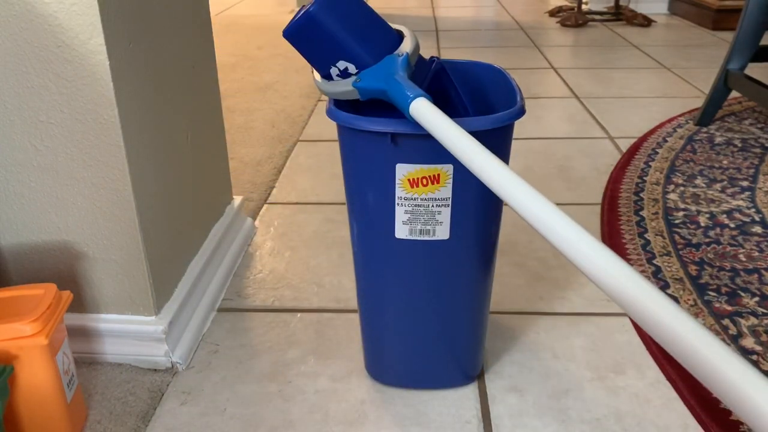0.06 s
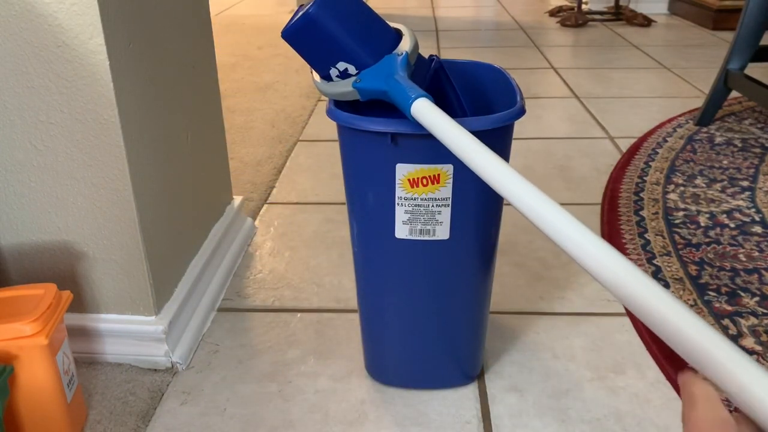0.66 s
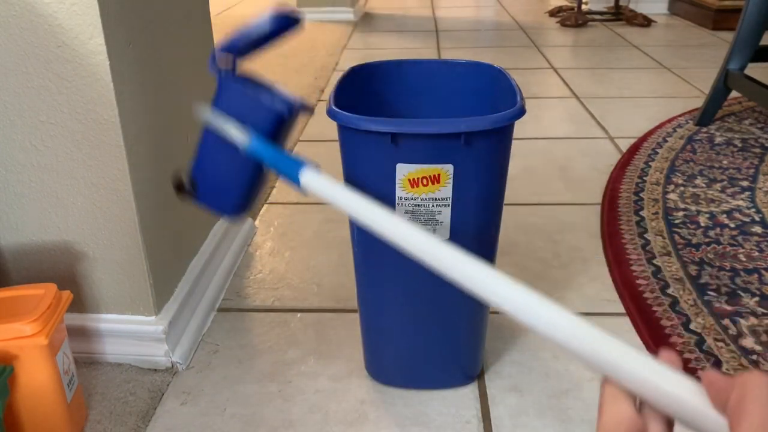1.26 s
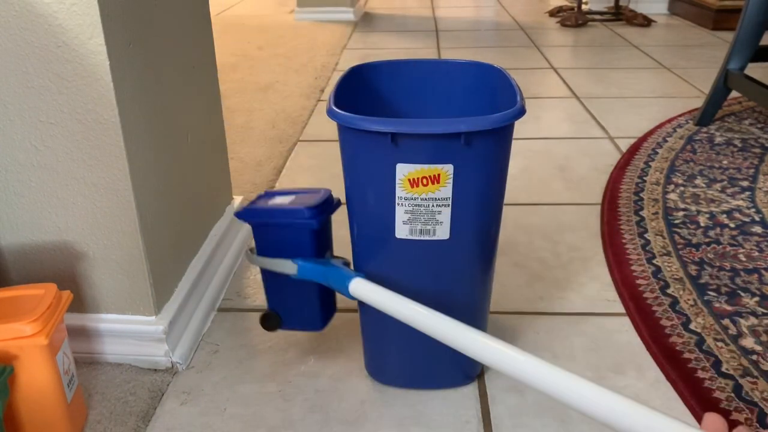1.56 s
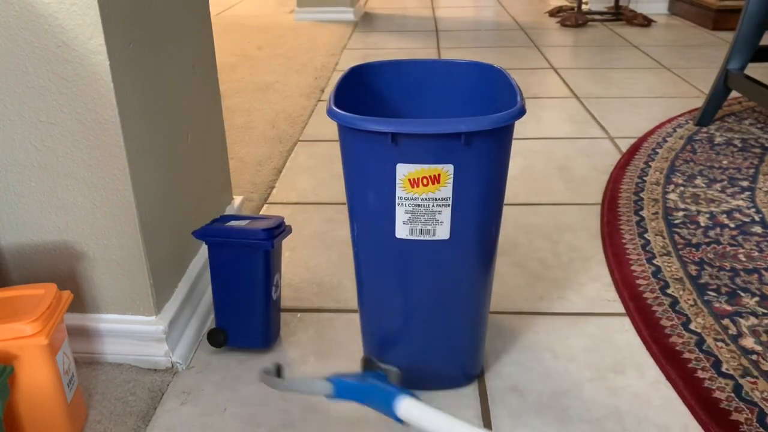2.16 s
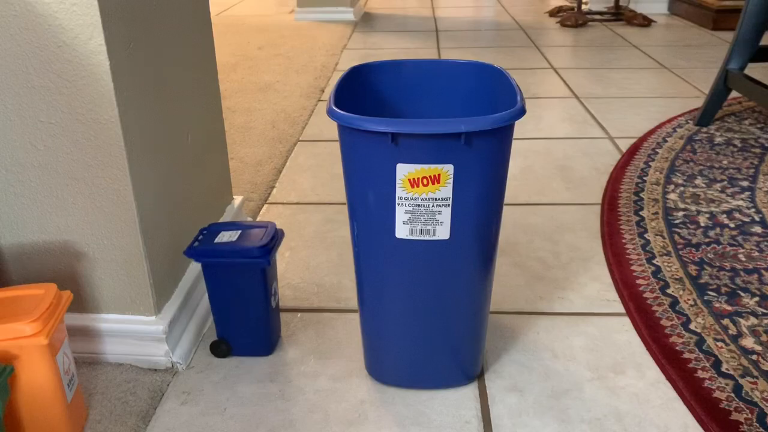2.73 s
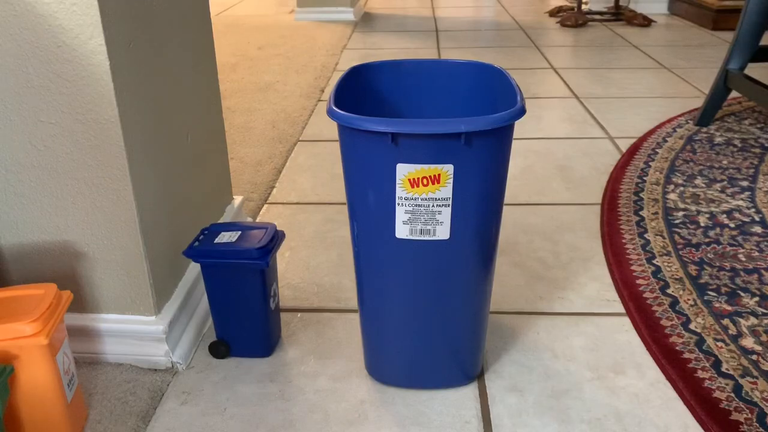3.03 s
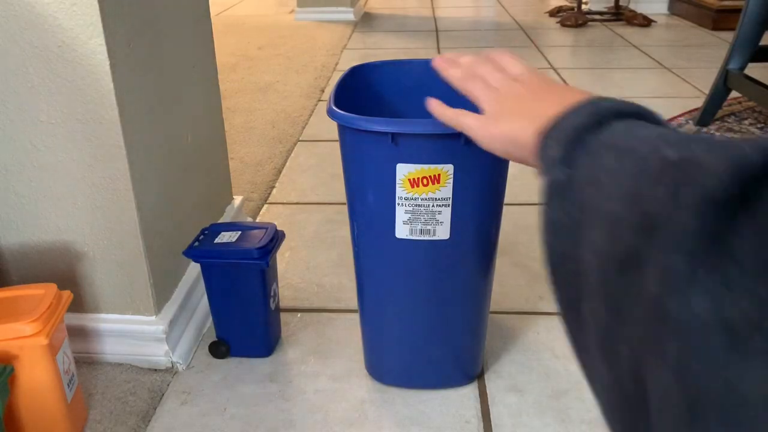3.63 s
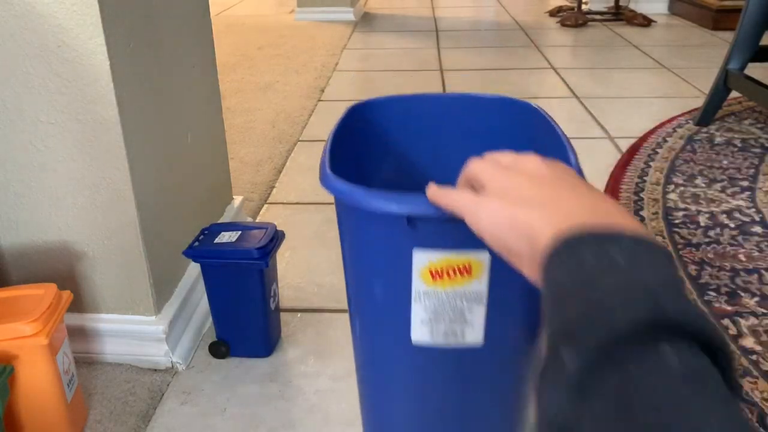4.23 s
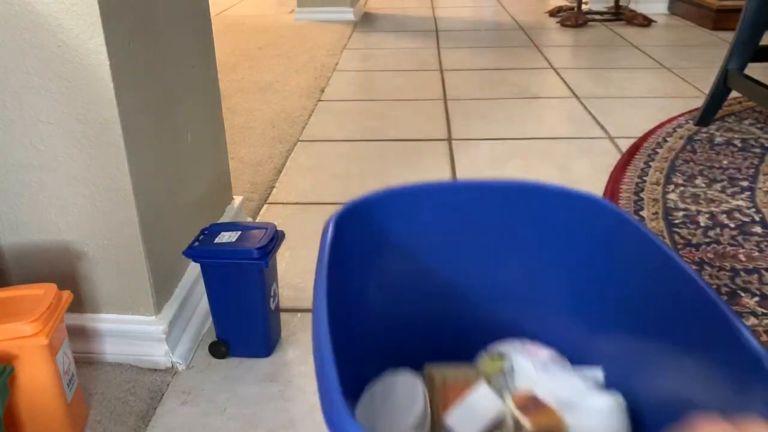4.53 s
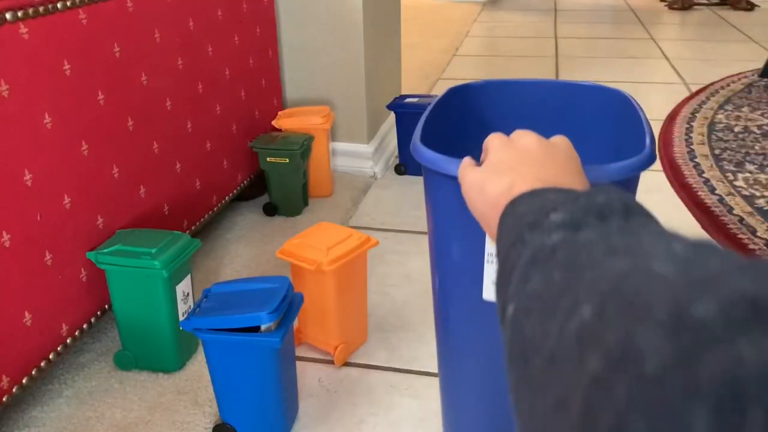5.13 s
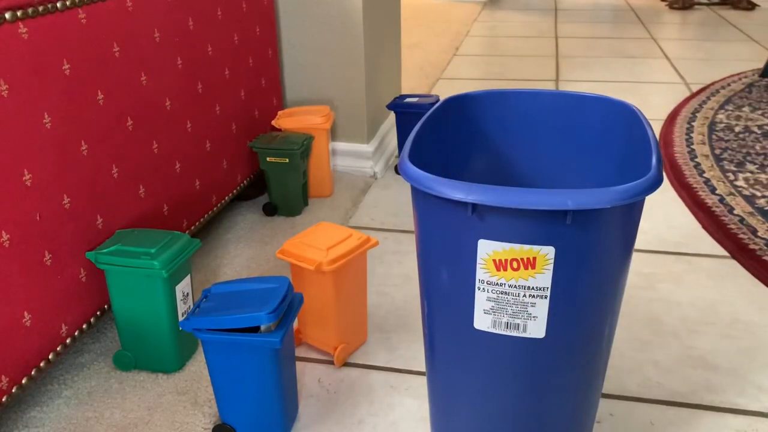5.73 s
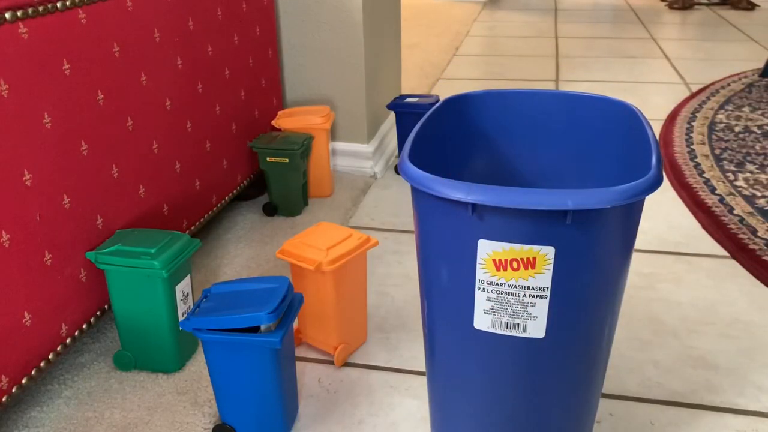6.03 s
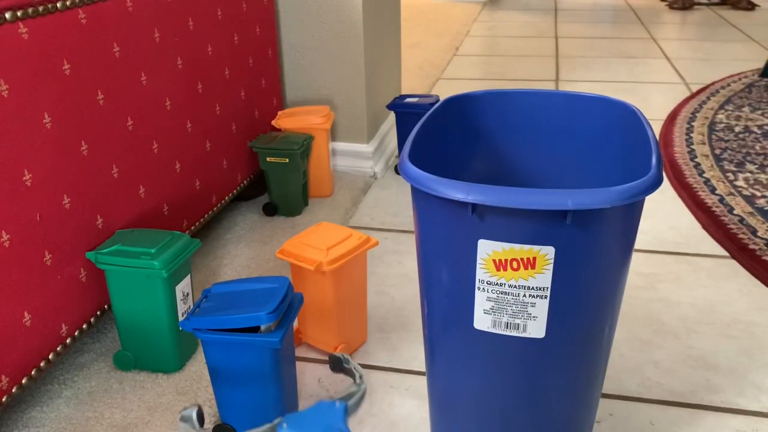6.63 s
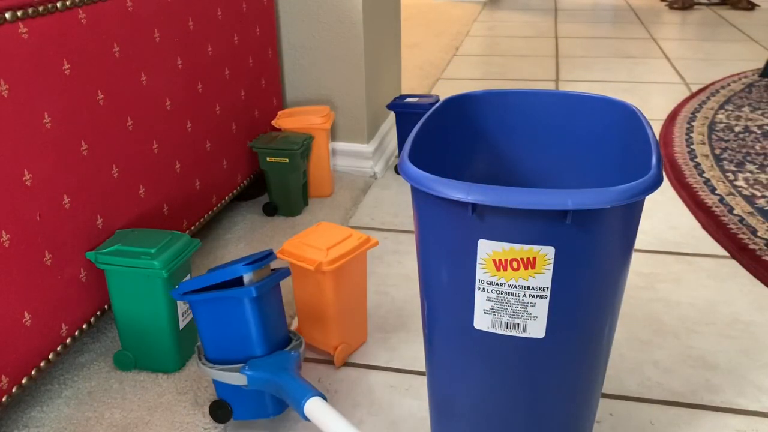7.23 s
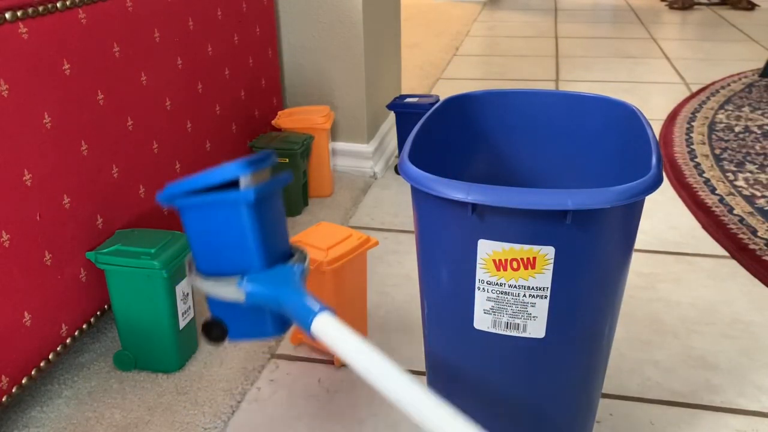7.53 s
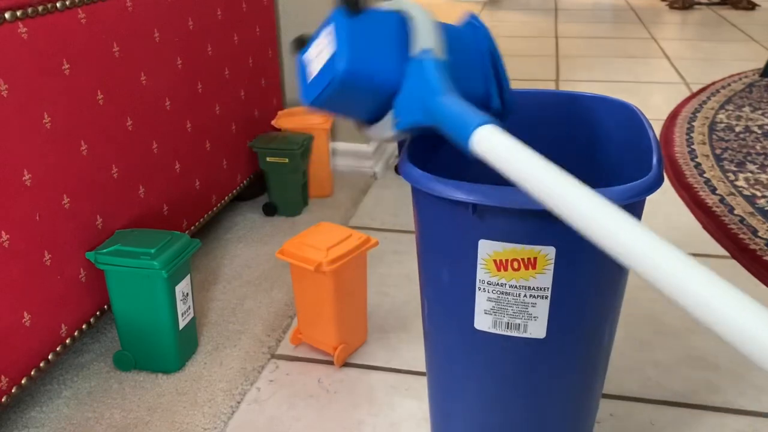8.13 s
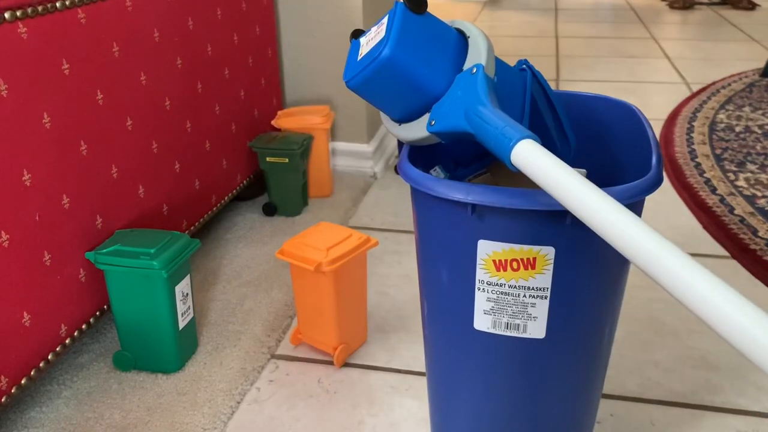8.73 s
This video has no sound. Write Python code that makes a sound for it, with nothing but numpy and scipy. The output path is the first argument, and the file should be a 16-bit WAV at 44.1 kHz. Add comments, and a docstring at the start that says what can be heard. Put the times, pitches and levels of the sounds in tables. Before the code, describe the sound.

In a small, lively tiled room, heard close up in stereo over a faint hum, a grabber sets down a plastic toy bin with hollow knocks and rocking clacks. Next a plastic wastebasket scrapes and rumbles along the floor twice, its base sticking and slipping. A sleeve brushes softly, the grabber's jaws clack shut on a second toy bin, and it thumps as it is lifted. Finally paper scraps rustle out and tap against the basket's wall.

```python
"""A small live room with a tile floor, heard from a close stereo microphone pair over a faint hum. A grabber
sets down and picks up small plastic toy bins: they knock, rock and clack, each contact pushing a thin wall and
ringing the hollow body. A tall plastic wastebasket is dragged over the tiles, its base sticking and slipping,
and the level dips briefly midway. Paper scraps are then tipped into it from a toy bin, crinkling as they slide
and clicking against its wall. Hand and sleeve rub softly as the arm moves."""
import sys
import numpy as np
from scipy import signal
from scipy.fft import rfft, irfft, next_fast_len
from scipy.io import wavfile
from scipy.ndimage import map_coordinates

SR = 44100
rng = np.random.default_rng(int(sys.argv[2]) if len(sys.argv) > 2 else 0)


def transcribe(u):
    """Save the signal u as a 16-bit wav file named by the first command-line argument.

    u: samples, shape (n,) or (channels, n), limited to [-1, 1]; the rate is SR.
    q: integer samples, one column per channel.
    """
    v = np.clip(np.atleast_2d(u).T, -1, 1)
    q = np.round(v * 32767).astype(np.int16)
    wavfile.write(sys.argv[1], SR, q)


N = 387198
HIT_SIZE, BLOW_SIZE = 8192, SR // 100  # samples: room for one contact; span its level is taken over

# A toy bin jolts in the grabber and its lid flaps.
# Each row: start in seconds, level in dB, thump pitch in Hz, hardness in dB.
JOLTS = [(0.972, -51.5, 600, -39), (1.07, -54.5, 630, -18), (1.3105, -16.5, 317, -7),
         (1.351, -38.5, 314, -13), (1.361, -26, 301.5, -9.5), (1.534, -33.5, 291, -15),
         (1.8535, -25.5, 386, -2.5), (1.8845, -23.5, 276, -21), (1.899, -30, 271.8, -5.5),
         (7.797, -24.5, 214, -28), (7.811, -50, 208, -3), (7.945, -42, 227, -37), (7.963, -49, 218, -52)]
# Hand, tile joints and toy bin bump the basket. Each row: as for the jolts.
BASKET_BUMPS = [(3.659, -41.5, 228, -34), (4.064, -32, 264, -13), (4.074, -31, 154, -22),
                (4.163, -39.5, 302, 3.5), (4.19, -45, 302, 6.5), (4.222, -30, 258, 1.5),
                (4.239, -33, 191, 5.5), (4.26, -41, 300, 10), (4.281, -32, 330, 4), (4.338, -34.5, 303, 2),
                (4.378, -41.5, 305, 10), (4.477, -28, 262, -11), (4.494, -32, 173, -23),
                (4.503, -20.5, 138, -13.5), (4.598, -30, 513, -11), (4.8075, -31.5, 271, -3.5),
                (4.81, -24, 164, -41), (4.865, -36, 260, -4), (4.882, -29, 184, -17),
                (4.904, -32.5, 312.5, -6.5), (8.1535, -30.5, 403, -2.5), (8.156, -24.5, 202, -34),
                (8.167, -31.5, 186, -45)]
# A bin lands and rocks to rest. Each row: as for the jolts, then boom in dB.
LANDINGS = [(1.7051, -31, 433, 2, 1), (1.7176, -14.5, 407, -8.5, -2.5), (1.996, -36.5, 430, -45, -3),
            (2.001, -24, 448, -24, 1), (2.016, -33, 480, -35, 4.5), (2.333, -24, 425, -22, -2.5),
            (2.347, -36.5, 480, -37, 7), (2.357, -31.5, 470, -18, 0.5), (2.535, -33, 440, -37, 0),
            (2.541, -33, 461, -29.5, 1.5), (2.683, -29, 380, -28, -2), (2.763, -32, 406, -14.5, 2.5),
            (2.774, -37.5, 388, -21, 1)]
# Contacts that share a thump pitch. Each row: start in seconds, level in dB, hardness in dB.
JAW_GRABS = [(6.758, -36, 1.5), (6.772, -36, -14), (6.802, -44, -3), (6.8178, -26.5, 7), (6.827, -29, -4),
             (6.851, -36, -18), (6.9055, -21.5, 1), (6.918, -24, -24)]  # the jaws close on a bin
LOOSE_TICKS = [(0.105, -55, -18), (0.712, -53, -55), (0.7465, -45, -31), (1.227, -51, -56),
               (1.610, -48.5, -15.5), (1.648, -49, -10), (1.696, -37.5, 6), (1.702, -39, -11),
               (2.741, -38, 4), (2.996, -47.5, -5), (3.105, -53, -2), (3.685, -57.5, -4), (5.28, -63, -4.5),
               (5.35, -67.5, 4), (5.375, -57.5, -11), (5.743, -58, 3), (5.808, -55, 8.5), (5.832, -53, -20),
               (5.841, -52, 0), (5.889, -54, -36), (5.92, -64, 7.5), (7.792, -48, 9)]  # loose plastic parts touch
SCRAP_HITS = [(8.202, -58.5, 18.5), (8.275, -45.5, 2), (8.36, -44, 9), (8.374, -56.5, 20.5),
              (8.456, -39, -6), (8.466, -49, 9), (8.485, -44.5, 12), (8.5, -31, 0), (8.536, -51.5, 5),
              (8.57, -36.5, -1.5), (8.593, -46.5, -2)]  # scraps land in the basket
# Small pieces are struck. Each row: start in seconds, level in dB, pitch in Hz.
CLINKS = [(1.72, -30, 2970), (1.852, -37.5, 2800), (2.743, -47.5, 2790), (2.752, -50, 2960),
          (8.199, -56, 4234), (8.222, -50.5, 4800), (8.261, -55, 4240), (8.273, -58, 4530),
          (8.483, -53, 4480), (8.499, -35, 8620), (8.536, -47, 8900)]  # thin stiff bits
TOCKS = [(2.996, -56.5, 1264), (5.843, -50, 1228), (8.157, -39.5, 871.5), (8.254, -45, 505),
         (8.347, -46.5, 520), (8.359, -47, 802), (8.451, -49, 818), (8.458, -42, 770), (8.467, -50, 825),
         (8.498, -37.5, 847), (8.513, -42.5, 900), (8.563, -49, 796), (8.592, -49, 800)]  # hard scraps and loose parts on hollow plastic

# The basket's drag in two spans, a list for each. Each row: time in seconds, friction level in dB.
DRAG_SPANS = [
    [(3.72, -74), (3.84, -63), (3.905, -50), (4.09, -41), (4.205, -39), (4.24, -34), (4.37, -38.5),
     (4.44, -45), (4.5, -38.5), (4.7, -47.5)],
    [(4.735, -51.5), (4.9, -44), (4.955, -47), (4.99, -44.5), (5.04, -46), (5.15, -46.5), (5.34, -73.5)],
]
GRIT_DB, RUMBLE_DB = (-4, -6.5), (-2.5, -0.5)  # scratch and wall rumble of each span, over its friction
# Strokes that swell and fade. Each row: peak time in seconds, level in dB, rise and fade in seconds.
BASE_CHATTERS = [(4.5, -40.5, 0.22, 0.36), (4.91, -46.5, 0.036, 0.093)]  # the basket's tilted base on the tiles
PAPER_SLIDES = [(0.005, -58, 0.034, 0.31), (5.83, -62, 0.16, 0.12), (8.21, -52.5, 0.29, 0.28),
                (8.275, -54.5, 0.16, 0.23), (8.52, -48, 0.29, 0.16)]  # scraps shifting
HAND_RUBS = [(0.12, -62, 0.55, 0.6), (0.82, -57, 0.4, 0.25), (5.8, -68.5, 1.8, 0.48),
             (8.18, -51.5, 0.76, 0.85), (8.53, -48, 0.15, 0.16)]  # hand and sleeve on grabber and basket
ROD_SLIDES = [(0.2, -75, 0.71, 0.34), (0.56, -64.5, 0.85, 0.42), (3.28, -71.5, 0.42, .25),
              (3.47, -72.5, 0.17, 0.15), (7.27, -74.5, 0.16, 0.056)]  # the grabber's rod and jaws
SLEEVE_BRUSHES = [(3.75, -67.5, 0.46, .4), (5.55, -64, 0.58, 0.73), (6.17, -72, 0.31, 0.45),
                  (6.55, -84.5, 0.37, 0.33), (7.7, -75.5, 0.53, 0.28)]  # a sleeve going past
# Plastic slips on plastic or tile. Each row: as for the strokes, then pitch in Hz, waver in Hz.
SQUEAKS = [(0.01, -62.5, 0.14, 0.24, 6710, 130), (2.733, -49, 0.12, 0.1, 2957, 194),
           (7.342, -70, 0.059, 0.092, 4330, 200.7), (7.401, -74, 0.045, 0.25, 4330, 269),
           (7.529, -74.5, 0.25, 0.96, 4336, 298)]

# Ring of the hollow bodies. Each row: frequency in Hz, level in dB.
TOY_MODES = [(371, -48), (433, -37), (510, -50), (645, -48), (682, -48), (965, -49.5), (1039, -52),
             (1292, -54.5), (1470, -51.5), (1780, -54), (2669, -58), (2900, -53), (3973, -60), (4151, -59)]
BASKET_MODES = [(165, 6), (225, 11.5), (305, 6), (510, 5.5), (610, 11), (810, 2), (1130, -2), (1960, -8)]
JAW_MODES = [(425, 3), (520, -10), (700, -3), (800, 0.5), (1040, -0.5), (1250, -6), (1850, -15.5),
             (2330, -12), (2790, -7.5)]  # the jaws with a bin between them
# Ring of the small pieces. Each row: multiple of the piece's pitch, level in dB.
CLINK_MODES = [(0.298, -7), (.64, -7.5), (0.901, -6), (1.001, 8.5), (1.16, -15.5), (1.62, -10.5)]
TOCK_MODES = [(.91, -8), (1, 3), (1.37, -7), (2, -7), (2.901, -14), (3.7, -17), (5.3, -18)]
# Resonances of the dragged basket. Each row: centre in Hz, width in Hz, level in dB.
BASKET_HOLLOW = [(128.6, 31, 7), (567, 130, -3.5), (904, 110, -0.5), (1273, 160, -4.5), (1999, 140, -5)]

# Spectra of a contact's body. Each row: multiple of the thump or clack pitch, level in dB.
WALL_THUMP = [(.05, -53.5), (.14, -36.5), (.3, -24), (.55, -4.5), (.9, 3.5), (1.25, -0.5), (2, -22),
              (4, -33), (12, -68.5)]
HARD_CLACK = [(.2, -31.5), (.5, -5), (.8, 2.5), (1.1, -3.5), (1.6, -6), (2.402, -14), (3.6, -24), (9, -30)]
FLOOR_CLACK = [(.03, -62.5), (.18, -36.5), (.5, -2), (.8, 0), (1.15, -3.5), (1.55, -8), (2.3, -17),
               (3.6, -25), (9, -42.5)]  # rounder: a bin on tile
GRIP_CLACK = [(.03, -49.5), (.2, -24), (.45, -3.5), (.8, -2.5), (1.1, -1), (1.5, -11.5), (2.5, -18),
              (3.6, -32.5), (9, -39.5)]  # round: a bin in the jaws
# Spectra of sharp edges, friction and air. Each row: frequency in Hz, spectral density in dB.
EDGE_CRACK = [(1200, -37.5), (3200, 2), (5500, -2.5), (8000, -1), (11500, 6), (14000, 2), (16000, -15.5)]
JAW_SNAP = [(1500, -52), (3200, -6.5), (5500, -12), (8000, -8.5), (11500, 8), (14000, 0.5), (16000, -10)]
WALL_RUMBLE = [(30, -34), (60, -9), (130, -7.5), (200, 2), (300, -2), (450, -10), (800, -43.5), (2000, -53)]
CHATTER_BAND = [(250, -22.5), (450, 0.5), (600, -3.5), (800, -12.5), (1100, -52), (2500, -50)]
GRIT_SCRAPE = [(400, -11), (900, 1.5), (1300, -1), (2000, -5), (3500, -11), (6000, -15), (9000, -14),
               (13000, -7), (16000, -17.5)]
PAPER_RUSTLE = [(400, -22), (800, 12), (1600, 8), (3000, 3), (5000, -2.5), (9000, -7), (13000, -5),
                (16000, -12)]
DULL_RUB = [(60, -17), (150, 7.5), (330, 6), (700, 2.5), (1500, -12), (4000, -37), (12000, -83)]
ROD_HISS = [(1200, -25), (2100, -6), (2550, 2.5), (2950, -4), (3300, -5), (3650, -2.5), (4300, -13),
            (7000, -51)]
CLOTH_RUSTLE = [(200, -7.5), (700, 3), (1800, -0.5), (3500, -3.5), (7000, -17), (14000, -20.5)]
STILL_AIR = [(25, -32), (50, -3), (114, -9), (250, -12.5), (330, -7), (900, -12.5), (1740, -11.5),
             (2300, -21), (4000, -23), (5500, -34), (9000, -36), (11500, -29), (15500, -36.5)]

# The room's decay. Each row: frequency in Hz, seconds to fall 60 dB.
ROOM_T60 = [(100, 0.16), (400, 0.49), (1200, 0.4), (4000, 0.36), (9000, 0.22), (15000, 0.048)]
# Responses of the room and the microphone pair. Each row: frequency in Hz, gain in dB.
ROOM_GAIN = [(100, 2.5), (250, -5), (380, -4), (600, -1), (1000, -5), (3000, -0.5), (12000, 2)]
MID_GAIN = [(1000, 1.5), (4000, 1.5), (8300, 2), (9600, -19.5), (11300, -4), (15000, 1.5)]  # mid is the sum of the two microphones
SIDE_GAIN = [(60, -9), (180, -11), (400, -3), (1200, 0.5), (2200, 2), (4000, 1.5), (8500, 1.5), (11000, -1),
             (13000, -12), (15500, -5.5)]  # side is their difference
# How far a knock leans to the left microphone. Each row: frequency in Hz, share of mid put into side.
LEFT_LEAN = [(110, 0), (380, 0.31), (800, -0.23), (1300, -0.28), (2400, 0), (4400, .2), (8000, 0)]


def jolts():
    """A toy bin held in the air: a deep hollow thump under the slap of its lid."""
    return knocks(JOLTS, TOY_MODES, HARD_CLACK, EDGE_CRACK, clack_hz=1450, clack_growth=0.11,
                  thump_db=-2.5, clack_db=-12, crack_db=-4.5, ring_db=-15.5, room_db=-5,
                  ring_t60=0.063, clack_rise_s=0.0014, crack_rise_s=0.0017, lag_s=0.0045, lean=0.05)


def landings():
    """The small stiff bin strikes the tiles with a round, hollow clack and rocks on its feet."""
    hits, booms = [row[:4] for row in LANDINGS], [row[4] for row in LANDINGS]
    return knocks(hits, TOY_MODES, FLOOR_CLACK, EDGE_CRACK, clack_hz=1234, clack_growth=0.14,
                  thump_db=-1, clack_db=0.5, crack_db=0.5, ring_db=-7.5, room_db=-5, booms=booms,
                  ring_t60=0.11, clack_rise_s=0.0014, crack_rise_s=0.0034, lag_s=0.0087, lean=0.08)


def jaws():
    """The jaws snap shut close to the microphones and set the held bin ringing."""
    hits = pitched(JAW_GRABS, thump_hz=383)
    return knocks(hits, JAW_MODES, GRIP_CLACK, JAW_SNAP, clack_hz=1080, clack_growth=0.13,
                  thump_db=-8.5, clack_db=-4.5, crack_db=-1.5, ring_db=-3.5, room_db=-9.5,
                  ring_t60=0.057, clack_rise_s=0.002374, crack_rise_s=0.0012, lag_s=0.003, lean=-0.12)


def basket_knocks():
    """The big soft basket gives low bumps that die quickly."""
    return knocks(BASKET_BUMPS, BASKET_MODES, HARD_CLACK, EDGE_CRACK, clack_hz=1420, clack_growth=1,
                  thump_db=-5, clack_db=-9.5, crack_db=-12, ring_db=-13.5, room_db=-7,
                  ring_t60=0.034, clack_rise_s=0.001258, crack_rise_s=0.0038, lag_s=0.00697, lean=-0.05)


def basket_drag(chatter_db=-14, hollow_db=-5):
    """The base judders over the tiles; each jerk shakes the walls, catches grit and rings the hollow."""
    judder = stick_slip(rate=46, decay_s=0.008, glide=0.3)
    rumble = coloured(grains(1500, 1) * judder ** 0.7, WALL_RUMBLE)
    chatter = coloured(grains(1200, 1.5) * judder, CHATTER_BAND)
    grit = coloured(crackles(rate=900, spread_db=2.3, q=16, count=36) * judder ** 0.4, GRIT_SCRAPE)
    hollow = 0
    for hz, width, db in BASKET_HOLLOW:
        catches = grains(170, 1.5) * judder ** 0.6
        hollow += amp(db) * unit(resonate(catches, hz, hz / width))
    body = amp(chatter_db) * chatter + amp(hollow_db) * unit(hollow)
    sliding = sum(level(pull) * (body + amp(rumble_db) * rumble + amp(grit_db) * grit)
                  for pull, rumble_db, grit_db in zip(DRAG_SPANS, RUMBLE_DB, GRIT_DB))
    return sliding + swells(BASE_CHATTERS) * chatter


def scraps():
    """Stiff scraps click against the basket's wall and ring its hollow."""
    hits = pitched(SCRAP_HITS, thump_hz=750)
    return knocks(hits, BASKET_MODES, HARD_CLACK, EDGE_CRACK, clack_hz=990, clack_growth=-0.1,
                  thump_db=-10.5, clack_db=-9.5, crack_db=-6.5, ring_db=-8.5, room_db=-9.5,
                  ring_t60=0.07, clack_rise_s=0.0027, crack_rise_s=0.0018, lag_s=0.00291, lean=-0.13)


def paper():
    """Scraps slide past each other in clumps of separate crinkles."""
    crinkles = crackles(rate=300, spread_db=2.2, q=18, count=32)
    return swells(PAPER_SLIDES) * coloured(crinkles * amp(0.35 * wobble(41)), PAPER_RUSTLE)


def ticks():
    """Light touches graze more than they strike and hardly move the walls."""
    hits = pitched(LOOSE_TICKS, thump_hz=646)
    return knocks(hits, TOY_MODES, HARD_CLACK, EDGE_CRACK, clack_hz=2350, clack_growth=0.025,
                  thump_db=-10, clack_db=-2, crack_db=-7, ring_db=-16, room_db=-3.5,
                  ring_t60=0.06, clack_rise_s=0.0022, crack_rise_s=0.0013, lag_s=0.002, lean=0)


def clinks():
    """Thin stiff bits clink high."""
    return pieces(CLINKS, CLINK_MODES, ring_cycles=51, room_db=-11, lean=0, scatter=0.022)


def tocks():
    """Heavier bits knock with a short, woody pitch, a little right of centre."""
    return pieces(TOCKS, TOCK_MODES, ring_cycles=27, room_db=-7, lean=-0.19, scatter=0.016)


def squeaks(flutter_db=3):
    """Plastic slips under light pressure: rough, unsteady tones smeared into a narrow hiss."""
    t = np.arange(N) / SR
    drift = np.cumsum(wobble(1600)) / SR
    tones = sum(swells([stroke]) * np.sin(2 * np.pi * (hz * t + waver * drift))
                for *stroke, hz, waver in SQUEAKS)
    return tones * amp(flutter_db * wobble(120)) * np.array([[1], [0.5]])  # left of centre


def handling():
    """Hand and sleeve rub on plastic, dull and uneven."""
    return swells(HAND_RUBS) * coloured(grains(1500, 1.5) * amp(3 * wobble(28)), DULL_RUB)


def rod():
    """Smooth plastic slides in the grabber with a soft, narrow hiss."""
    return swells(ROD_SLIDES) * coloured(rng.standard_normal((2, N)) * amp(1.5 * wobble(45)), ROD_HISS)


def sleeve():
    """Cloth rustles in small uneven puffs as the arm moves."""
    return swells(SLEEVE_BRUSHES) * coloured(grains(2500, 2) * amp(3.5 * wobble(22)), CLOTH_RUSTLE)


def room(feed, gap_s=0.0014, tails=24):
    """The near walls answer, in mid and side; the tail changes as things move about."""
    out, step = np.zeros((2, N + SR)), N // tails + 1
    for start in range(0, N, step):
        hz, t, noise = signal.stft(rng.standard_normal((2, SR // 2)), SR, nperseg=256)
        decay = amp(-60 * t / along(ROOM_T60, hz)[:, None])
        tail = signal.istft(noise * decay, SR, nperseg=256)[1]
        tail *= 1 - np.exp(-(np.arange(tail.shape[1]) / SR / gap_s) ** 4)
        wet = signal.fftconvolve(feed[None, start:start + step], tail / np.linalg.norm(tail[0]), axes=1)
        out[:, start:start + wet.shape[1]] += wet
    return out[:, :N]


def room_tone(air_db=-65.5, hum_hz=59, hum_db=-70.5):
    """Still air all round the pair, and a wavering low hum in the centre."""
    air = amp(air_db) * coloured(rng.standard_normal((2, N)), STILL_AIR)
    hum_gain = amp(hum_db + 1.6 * wobble(1.9))
    hum = hum_gain * np.sin(2 * np.pi * hum_hz * np.arange(N) / SR + wobble(3.5))
    return air + hum * np.array([[1], [0]])


def knocks(hits, modes, clack_spectrum, crack_spectrum, clack_hz, clack_growth, thump_db, clack_db,
           crack_db, ring_db, room_db, ring_t60, clack_rise_s, crack_rise_s, lag_s, lean, booms=0):
    """Each contact clacks, cracks, pushes a wall and rings the body; gives mid, side and room feed."""
    out, t = np.zeros((3, N + HIT_SIZE)), np.arange(HIT_SIZE) / SR
    mode_hz, mode_db = np.transpose(modes)
    mode_t60 = ring_t60 / (1 + mode_hz[:, None] / 6000)  # high modes die sooner
    ringing = np.sin(2 * np.pi * mode_hz[:, None] * t) * amp(-60 * t / mode_t60)
    for (start, db, thump_hz, hardness), boom in zip(hits, np.broadcast_to(booms, len(hits))):
        pitch = clack_hz * 2 ** (hardness / 53.5)  # 53.5 dB harder clacks an octave higher
        clack_colour = impulse(clack_spectrum, pitch, ripple_db=6)
        crack_colour = impulse(crack_spectrum, 0.98, ripple_db=3)
        clack = burst(clack_colour, clack_rise_s, chatter_db=-13, chatter_t60=0.07, pulse=1)
        crack = burst(crack_colour, crack_rise_s, chatter_db=-19, chatter_t60=0.088)
        hit = amp(clack_db + clack_growth * hardness) * clack + amp(crack_db + hardness) * crack
        hit[0] += amp(thump_db) * blow(impulse(WALL_THUMP, thump_hz))
        shares = amp(mode_db + rng.normal(0, 2.5, (2, len(modes)))) * rng.choice([-1, 1], (2, len(modes)))
        shares /= 1 + (mode_hz / (3.3 * pitch)) ** 4  # soft blows miss high modes
        hit += amp(ring_db + boom) * blow(shares @ ringing)
        add_hit(out, hit, start, db, lean, room_db + boom)
    return bending_waves(out[:, :N], lag_s)


def pieces(rows, modes, ring_cycles, room_db, lean, scatter):
    """Small pieces ring briefly, high ones shortest; gives mid, side and room feed."""
    out, t = np.zeros((3, N + HIT_SIZE)), np.arange(HIT_SIZE) / SR
    ratio, mode_db = np.transpose(modes)
    for start, db, hz in rows:
        mode_hz = hz * ratio * (1 + scatter * rng.standard_normal(len(ratio)))
        envelope = amp(-60 * t * hz / ring_cycles) * (1 - np.exp(-t / 0.0017))
        ringing = np.sin(2 * np.pi * mode_hz[:, None] * t) * envelope
        shares = amp(mode_db) * rng.choice([-1, 1], (2, len(ratio)))
        add_hit(out, blow(shares @ ringing), start, db, lean, room_db)
    return out[:, :N]


def add_hit(out, hit, start, db, lean, room_db):
    """Lay one contact into mid, side and room feed; a positive lean moves it left."""
    mid, side = hit
    channels = np.array([mid, side + lean * mid, amp(room_db) * mid])
    out[:, round(start * SR):][:, :HIT_SIZE] += amp(db) * channels


def burst(colour, rise_s, chatter_db, chatter_t60, pulse=0):
    """A compact contact, then a weak chatter of loose parts; pulse weights one clean push in it."""
    t = np.arange(HIT_SIZE) / SR
    shape = t / rise_s * np.exp(1 - t / rise_s) + amp(chatter_db - 60 * t / chatter_t60)
    force = rng.standard_normal((2, HIT_SIZE)) * shape / np.linalg.norm(shape)
    force[0, round(rise_s * SR)] += pulse
    pair = signal.fftconvolve(force, colour[None], axes=1)[:, :HIT_SIZE]
    return np.array([blow(part) for part in pair])


def impulse(spectrum, scale, ripple_db=0, count=40):
    """Response of a spectrum scaled in pitch, rippled as each spot on a wall favours other resonances."""
    hz = np.fft.rfftfreq(HIT_SIZE, 1 / SR)
    ripple = np.c_[np.geomspace(900, 16000, count), np.r_[0, rng.uniform(-1, 1, count - 1)]]
    gain = amp(along(spectrum, hz / scale) + ripple_db * along(ripple, hz))
    cepstrum = irfft(np.log(gain))
    cepstrum[1:HIT_SIZE // 2] *= 2  # folding makes the response causal
    cepstrum[HIT_SIZE // 2 + 1:] = 0
    return irfft(np.exp(rfft(cepstrum)))


def bending_waves(x, lag_s, knee_hz=350):
    """Bending waves in thin plastic run slower at low pitch, so every blow chirps downward."""
    return filtered(x, lambda hz: np.exp(-2j * np.pi * lag_s * knee_hz * np.log1p(hz / knee_hz)))


def stick_slip(rate, decay_s, glide):
    """Uneven jerks, about rate a second, die quickly over a share of steady glide; rms 1."""
    gaps = rng.uniform(0.4, 1.6, 2000) / rate
    starts = np.cumsum(np.r_[0, gaps])
    t = np.arange(N) / SR
    last = np.searchsorted(starts, t, side="right") - 1
    strength = amp(rng.normal(0, 2.9, len(starts)))
    return unit(glide + strength[last] * np.exp(-(t - starts[last]) / decay_s))


def crackles(rate, spread_db, q, count):
    """Tiny snaps ring briefly at count pitches, rate a second at each."""
    return unit(sum(resonate(grains(rate, spread_db), hz, q) for hz in np.geomspace(700, 15000, count)))


def grains(rate, spread_db):
    """Sparse mid and side pulses of uneven size, about rate a second; rms 1."""
    size = amp(spread_db * np.minimum(rng.standard_exponential(N), 4))
    fires = rng.random(N) < rate / SR
    return unit(size * fires * rng.standard_normal((2, N)))


def swells(rows):
    """Gain of strokes that climb 40 dB over their rise time and drop 40 dB over their fade time."""
    t = np.arange(N) / SR
    return sum(amp(db - 40 * np.maximum((peak - t) / rise, (t - peak) / fade))
               for peak, db, rise, fade in rows)


def level(curve):
    """Gain per sample from (seconds, dB) points; silent outside them."""
    return amp(np.interp(np.arange(N) / SR, *np.transpose(curve), -140, -140))


def wobble(rate):
    """A smooth random curve, rate knots a second."""
    return map_coordinates(rng.standard_normal(int(N * rate / SR) + 4), [np.arange(N) * rate / SR])


def pitched(rows, thump_hz):
    """Give every contact the same thump pitch."""
    return [(start, db, thump_hz, hardness) for start, db, hardness in rows]


def resonate(x, hz, q):
    """Ring one resonance with x; a higher q rings longer."""
    return signal.lfilter(*signal.iirpeak(hz, q, SR), x)


def coloured(x, spectrum):
    """x with a spectrum laid on it, at rms 1."""
    return unit(equalised(x, spectrum))


def equalised(x, curve):
    """x through a curve of (Hz, dB) points."""
    return filtered(x, lambda hz: amp(along(curve, hz)))


def filtered(x, response):
    """x through a response given as a function of frequency."""
    size = next_fast_len(N + HIT_SIZE)
    return irfft(rfft(x, size) * response(np.fft.rfftfreq(size, 1 / SR)), size)[..., :N]


def along(points, hz):
    """Read (frequency, value) points on a log axis."""
    knots, values = np.transpose(points)
    return np.interp(np.log(hz + 1e-3), np.log(knots), values)


def blow(x):
    """Scale a short sound to the energy of a 0 dB blow."""
    return unit(x) * np.sqrt(BLOW_SIZE / x.shape[-1])


def unit(x):
    """Scale to rms 1."""
    return x / np.sqrt(np.mean(x ** 2) + 1e-20)


def amp(db):
    """Decibels to gain."""
    return 10 ** (np.asarray(db) / 20)


def side_at_pair(mid, side, apart_db=-3, lead=0.63, lead_hz=700):
    """A knock's side signal partly follows its mid, as the right microphone hears it a little sooner."""
    following = filtered(mid, lambda hz: along(LEFT_LEAN, hz) - 1j * lead * hz / (hz + lead_hz))
    return amp(apart_db) * side + following


def scene(rub_room_db=-5):
    """Sources and room at the close pair, which hears the bass alike and the treble apart."""
    hit_mid, hit_side, hit_feed = (jolts() + landings() + ticks() + jaws() + basket_knocks()
                                   + scraps() + clinks() + tocks())
    hits = np.array([hit_mid, side_at_pair(hit_mid, hit_side)])
    rubs = basket_drag() + paper() + handling() + squeaks() + rod() + sleeve()
    room_feed = equalised(hit_feed + amp(rub_room_db) * rubs[0], ROOM_GAIN)
    mid, side = hits + rubs + room(room_feed) + room_tone()
    mid, side = equalised(mid, MID_GAIN), equalised(side, SIDE_GAIN)
    return np.array([mid + side, mid - side])


def record(dry, ceiling=0.95, top_hz=16100):
    """The hardest peak is rounded, the level dips briefly during the drag, and the top treble is cut."""
    rounded = dry / (1 + (dry / ceiling) ** 8) ** (1 / 8)
    dip = np.interp(np.arange(N) / SR, [4.69, 4.718, 4.745], [1, 0.08, 1])
    return filtered(rounded * dip, lambda hz: 1 / (1 + (hz / top_hz) ** 120))


dry = scene()
out = record(dry)
transcribe(out)
```